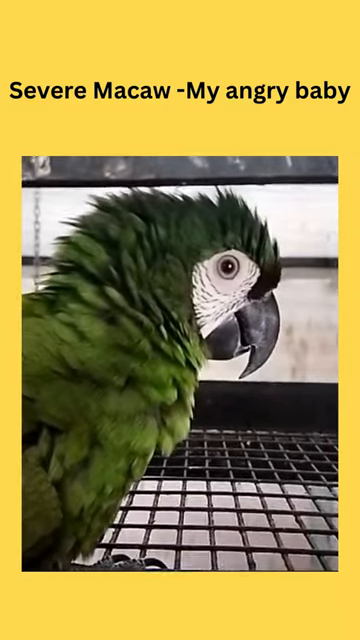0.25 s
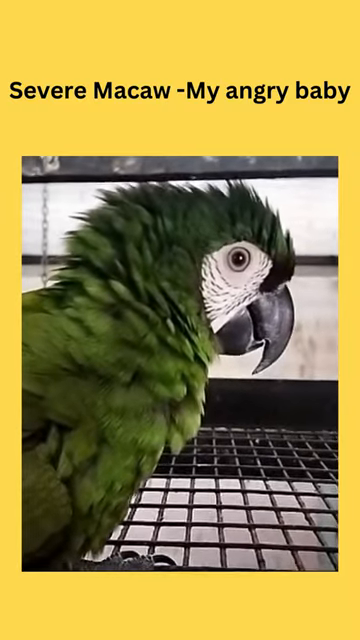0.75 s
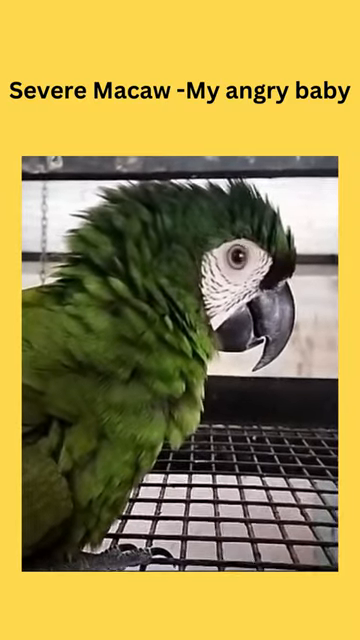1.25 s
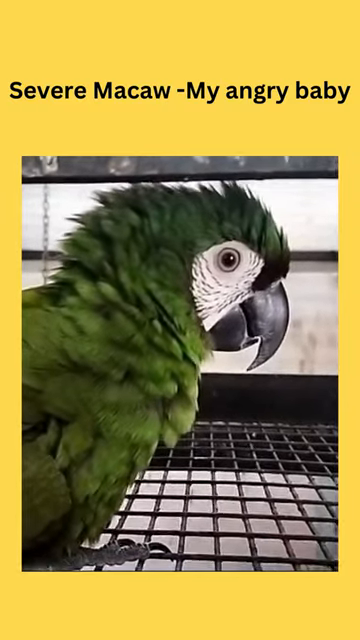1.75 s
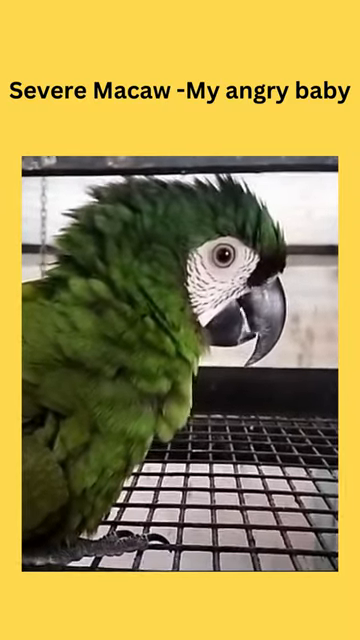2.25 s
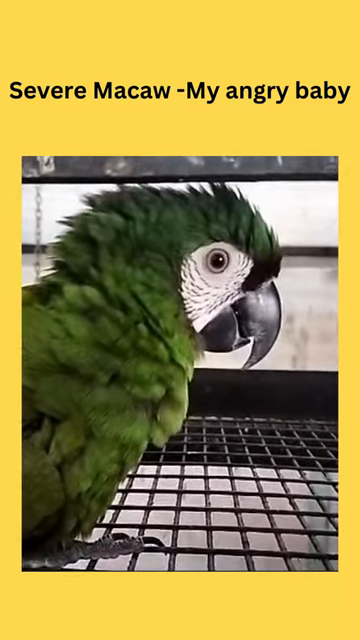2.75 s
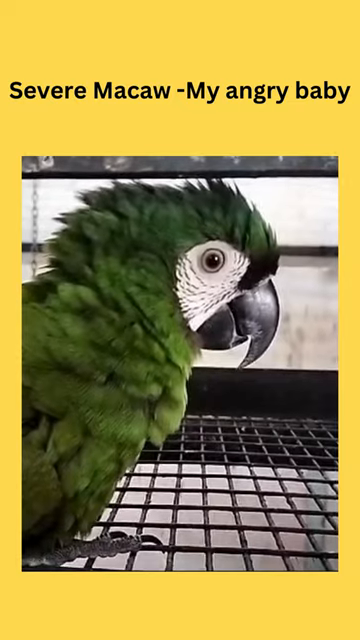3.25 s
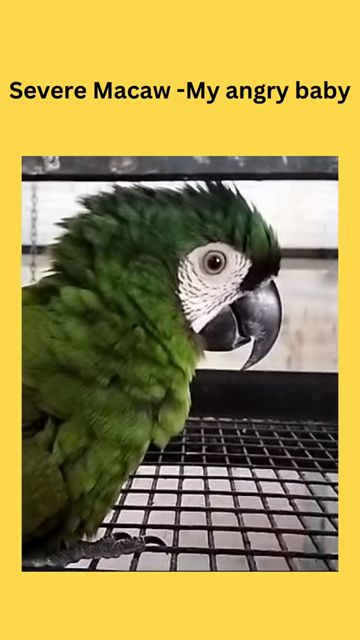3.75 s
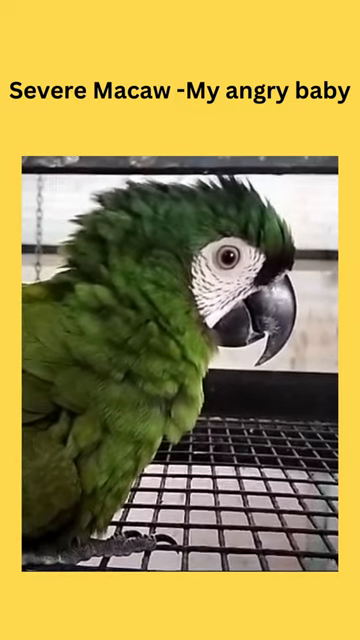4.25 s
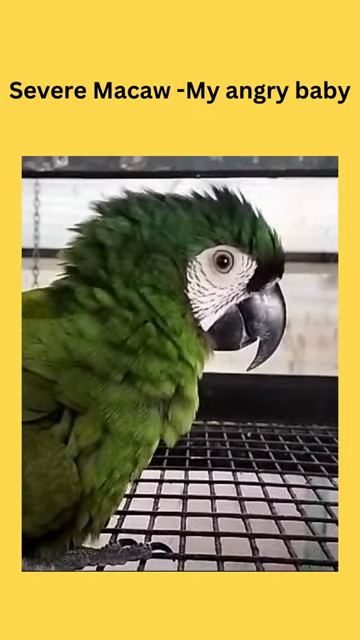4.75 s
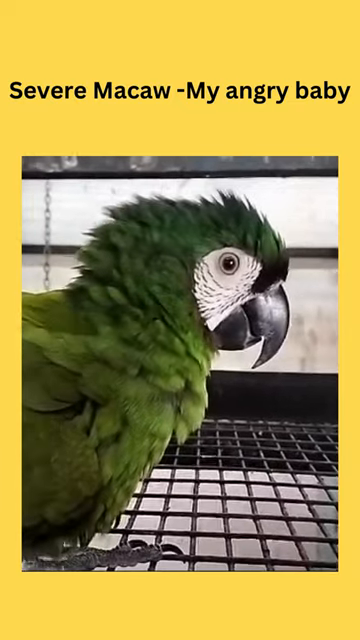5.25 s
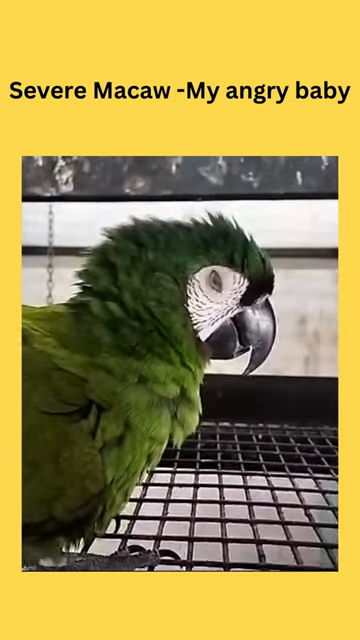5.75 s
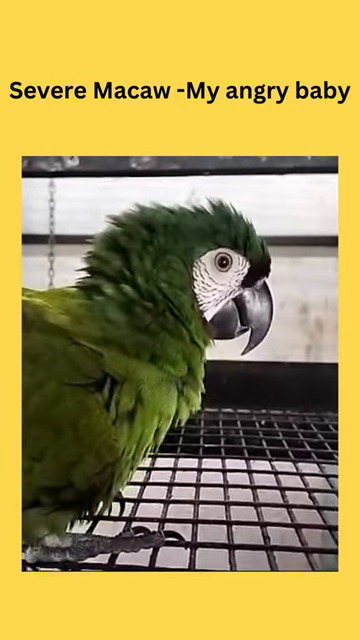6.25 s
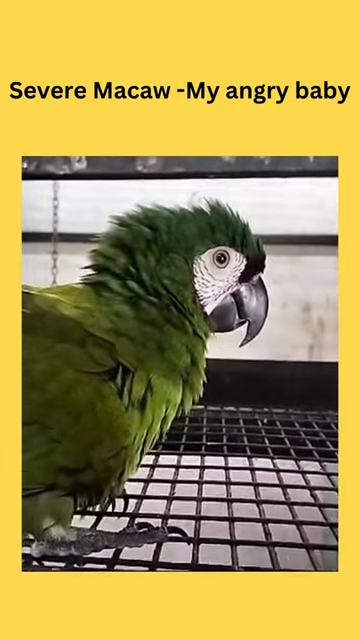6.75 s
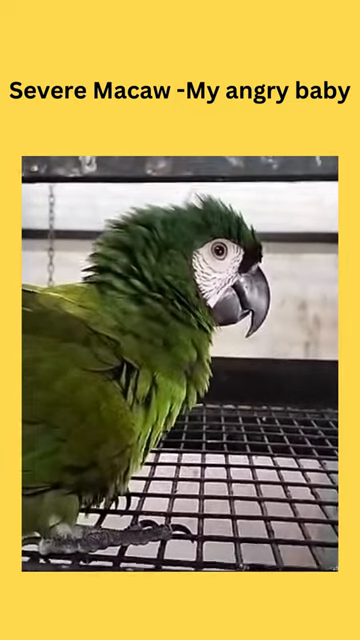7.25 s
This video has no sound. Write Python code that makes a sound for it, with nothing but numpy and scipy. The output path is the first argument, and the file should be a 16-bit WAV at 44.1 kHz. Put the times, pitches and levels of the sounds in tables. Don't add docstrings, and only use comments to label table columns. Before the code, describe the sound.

Raspy, piercing parrot screams in irregular bursts, a clicking beak rattle and two close gruff squawks, above steady humming fan rumble indoors.

```python
import sys
import numpy as np
from scipy import signal
from scipy.fft import rfft, irfft, next_fast_len
from scipy.io import wavfile
from scipy.ndimage import uniform_filter1d, map_coordinates

SR = 44100
rng = np.random.default_rng(int(sys.argv[2]) if len(sys.argv) > 2 else 0)


def wav_out(sig):
    wavfile.write(sys.argv[1], SR, np.round(np.clip(np.atleast_2d(sig).T, -1, 1) * 32767).astype(np.int16))


def level_to_linear(level):
    exponent = np.asarray(level, float) / 20
    return 10 ** exponent


N = 331632
T = np.arange(N) / SR


def unit(x):
    return x / np.sqrt(np.mean(x ** 2) + 1e-20)


def along(points, hz):
    f, v = np.transpose(points)
    return np.interp(np.log(hz + 1), np.log(f + 1), v)


def curves(rows):
    s, *cols = np.transpose(rows)
    return [np.interp(T, s, c) for c in cols]


def wobble(rate):
    return map_coordinates(rng.standard_normal(int(N * rate / SR) + 4), [T * rate])


def filtered(x, response):
    m = next_fast_len(N + SR // 2)
    return irfft(rfft(x, m) * response(np.fft.rfftfreq(m, 1 / SR)), m)[..., :N]


def coloured(x, spectrum):
    return unit(filtered(x, lambda hz: level_to_linear(along(spectrum, hz))))


def gate(rows, edge=0.00807):
    start, end = rows[0][0], rows[-1][0]
    return np.interp(T, [start - edge, start, end, end + edge], [0, 1, 1, 0])


def calls(rows, onset, swell_db, fall, under_db, tail):
    start, peak, db, *cols = (c[:, None] for c in np.transpose(rows))
    t = np.arange(0, N + 32, 32) / SR
    swell = -swell_db * np.clip((peak - t) / (peak - start), 0, 1)
    before = swell - onset * np.maximum(start - t, 0)
    late = np.maximum(t - peak, 0)
    after = np.maximum(-fall * late, -under_db - tail * late)
    power = level_to_linear(2 * (db + before + after)) + 1e-12
    share = power ** 2 / np.sum(power ** 2, axis=0)
    level_db = 10 * np.log10(power.sum(axis=0))
    out = [level_db] + [np.sum(share * c, axis=0) for c in [t - peak] + cols]
    return [np.interp(T, t, c) for c in out]


def syrinx(pitch_hz, jitter, rate, flutter_db):
    phase = 2 * np.pi * np.cumsum(pitch_hz * (1 + jitter * wobble(rate))) / SR
    return phase, unit(level_to_linear(flutter_db * wobble(rate=120)))


# t/s, depth level/dB, hold t/s
DUCKS = [(0.89, 9.5, 0.25), (1.296, 2, 0.34), (2.74, 3.5, 0.31), (4.449, 4.5, 0.39), (1.925, 13, 0.2),
         (2.155, 10, 0.25), (2.402, 7.5, 0.22), (3.351, 16.5, 0.066), (3.796, 4.5, 0.64),
         (4.852, 3.5, 0.17), (5.042, 17.5, 0.13), (5.403, 9.5, 0.51), (5.899, 22.5, 0.13), (6.381, 8, 0.27),
         (6.657, 15, .15), (6.873, 26.5, 0.094), (7.101, 17, .15), (7.302, 0, 0.34)]


def ducking():
    drop_db_per_s, recover_db_per_s = 603, 40.5
    dips = []
    for s, db, hold in DUCKS:
        going_down = drop_db_per_s * (T - s)
        coming_back = db - recover_db_per_s * (T - s - hold)
        dips.append(np.clip(np.minimum(going_down, coming_back), 0, db))
    return np.max(dips, axis=0)


# f/Hz, level/dB per Hz
RUMBLE = [(15, -49), (25, -22), (65, -6), (97, -7), (121, -6), (135, 1), (178, -0.5), (210, -7.5),
          (281, -4.5), (330, -14), (430, -19), (730, -120)]
# f/Hz, level/dB per Hz
WASH = [(200, -50), (320, 3), (900, 0.5), (1600, -3.5), (3000, 0.5), (8000, -26.5)]
# f/Hz, likeness [0 to 1]
ALIKE = [(25, 0.77), (80, 0.88), (130, 0.96), (300, 0.93)]


def fan():
    fan_db, hum_hz, hum_drift, hum_db = -39.5, 136, 0.062, -5
    wash_ducks = 0.87
    duck_db = ducking()

    def spread(hz):
        turn = np.arccos(np.clip(along(ALIKE, hz), 0, 1)) / 2
        return np.array([np.cos(turn), np.sin(turn)])

    mid, side = filtered(rng.standard_normal((2, N)), spread)
    rumble = coloured(np.array([mid + side, mid - side]), RUMBLE)
    rumble = unit(rumble * level_to_linear(0.64 * wobble(8.5)))
    hum_phase = 2 * np.pi * np.cumsum(hum_hz * (1 + hum_drift * wobble(3.1))) / SR
    rumble = rumble + level_to_linear(hum_db + 1.1 * wobble(3.04)) * np.sin(hum_phase)
    mid, side = rng.standard_normal((2, N)) * [[1], [.55]]
    wash = coloured(np.array([mid + side, mid - side]), WASH)
    return level_to_linear(fan_db - duck_db) * rumble + level_to_linear(fan_db - wash_ducks * duck_db) * wash


# start t/s, peak t/s, octave level/dB, octave f/Hz, fundamental level/dB
SCREAMS = [(.61, 0.708, -21.5, 4627, -1.5), (0.845, 0.907, -17, 4612, -8), (0.912, 0.945, -14, 4280, -7.5),
           (1.731, 1.82, -24, 4073, -3), (1.86, 1.949, -14, 4283, -3), (2.357, 2.396, -20, 4255, -7),
           (3.262, 3.309, -13, 4552, -6), (3.836, 3.949, -22, 3998, -3), (5.034, 5.171, -23.5, 4530, 0),
           (5.8, 5.9, -14.5, 4004, -9.5), (6.24, 6.356, -23, 4123, -5), (6.545, 6.61, -19, 4490, 1.5),
           (6.631, 6.705, -16, 4357, -5.5), (6.75, 6.816, -12.5, 4307, -5.5), (6.88, 7.019, -21, 4214, -1),
           (7.37, 7.451, -23.5, 4620, -0.5)]
SCREAM_ROUGH = [.038, .022, .02, .03, .027, .03, .02, .027, .03, .036, .034, .045, .036, .034, .028]
# start t/s, peak t/s, octave level/dB, octave f/Hz, fundamental level/dB
CHATTER = [(-.05, 0.012, -37, 3980, 8), (.31, 0.472, -28, 4180, -20), (1.229, 1.261, -30, 4405, -4),
           (1.42, 1.46, -32, 3970, 4.5), (2.078, 2.306, -33.5, 4266, -4), (2.481, 2.582, -28.5, 4397, -2),
           (2.68, 2.8, -34.5, 4320, -21), (3.09, 3.188, -24.5, 4010, 0), (3.421, 3.56, -31, 4064, -7.5),
           (3.981, 4.312, -24, 4050, -3.5), (4.302, 4.457, -25, 4583, 0), (4.747, 4.887, -29, 4176, -14.5),
           (5.42, 5.562, -28, 4730, -5), (5.64, 5.723, -32.5, 4100, 0)]


def high_screech():
    chatter_rough, calm_db = .036, -27
    sag_hz_per_s_db = 115
    linger_db_per_s = 7
    rows = np.array(SCREAMS + CHATTER)
    spare = len(SCREAMS) - len(SCREAM_ROUGH)
    scatter = SCREAM_ROUGH + [SCREAM_ROUGH[-1]] * spare + [chatter_rough] * len(CHATTER)
    rows = np.column_stack([rows, rows[:, 2], scatter])
    db, late, octave_hz, base_db, effort_db, rough = calls(
        rows, onset=400, swell_db=5, fall=150, under_db=9, tail=62)
    effort = np.maximum(effort_db - calm_db, 0)
    octave_hz = octave_hz - sag_hz_per_s_db * effort * np.clip(late, -.15, .1)
    base_db = base_db + linger_db_per_s * np.clip(late, 0, .3)
    phase, swing = syrinx(octave_hz / 2, jitter=rough, rate=280, flutter_db=3.5)
    upper = np.sin(2 * phase)
    for k, g in enumerate([-7, -19, -22], 3):
        upper = upper + level_to_linear(g) * np.sin(k * phase)
    hush_db = -9 * sum(map(gate, NEAR + YELPS[:1]))
    return level_to_linear(db + hush_db - 1.83) * swing * (upper + level_to_linear(base_db) * np.sin(phase))


def patchy(x, depth_db):
    z = signal.stft(x, nperseg=512)[2]
    field = uniform_filter1d(rng.standard_normal(z.shape), size=7, axis=0)
    field = uniform_filter1d(field, size=14, axis=1)
    return unit(signal.istft(z * level_to_linear(depth_db * unit(field)), nperseg=512)[1][:N])


# start t/s, peak t/s, level/dB, beak-open
# brightness level/dB
RASPS = [(-.05, .01, -37.5, -0.5), (.31, .49, -27, -3.5), (.58, .68, -29.5, -3.5), (.85, .96, -24.5, -1.5),
         (1.3, 1.45, -34, -9), (1.535, 1.555, -29, -5), (1.8, 1.88, -23, -6.5), (1.9, 1.97, -27.5, 9),
         (2.06, 2.26, -35.5, -18), (2.3, 2.38, -27.5, -7.5), (2.5, 2.58, -33.5, -8),
         (2.66, 2.85, -38, -3.5), (3.06, 3.2, -32, -3), (3.22, 3.255, -21.5, 0), (3.27, 3.34, -33.5, 23),
         (3.45, 3.6, -42, -12), (3.83, 4.1, -35, -3), (4.15, 4.45, -33, -2.5), (4.74, 4.86, -39, -0.5),
         (5.042, 5.06, -34.5, -8), (5.14, 5.19, -31, -9), (5.41, 5.55, -24, -12), (5.63, 5.72, -30.5, -9),
         (5.76, 5.8, -19, -9.5), (5.82, 5.9, -25.5, 3), (6.22, 6.4, -37.5, -5), (6.565, 6.61, -20.5, -3.5),
         (6.62, 6.78, -28, -2), (6.9, 7.03, -30.5, 0), (7.37, 7.5, -33, -5.5),
         (2.872, 2.985, -43, 3),
    (4.5, 4.583, -41, -5),
    (4.899, 4.967, -46.5, 1.5),
    (5.253, 5.318, -37, -7),
    (5.979, 6.082, -39, -10.5),
    (7.078, 7.259, -38, -7),
]
# f/Hz, level/dB per Hz
HARSH = [(530, -95), (900, -26), (1350, -7.5), (1640, -9.5), (2100, 3), (2620, -3.5), (3080, -4.5),
         (3290, 1.5), (4050, 4), (8500, -19.5), (11000, -62), (18700, -120)]
# f/Hz, level/dB per Hz
SHEEN = [(4410, -28), (7500, -0.5), (8710, -9), (9870, -11), (11500, -8.5), (13700, -18.5), (14250, -12),
         (14480, -39)]


def rasp():
    db, _, bright_db = calls(RASPS, onset=386, swell_db=3.4, fall=176, under_db=5.7, tail=70.5)
    struck = rng.random(N) < .3
    snaps = struck * rng.standard_normal(N) * level_to_linear(1.46 * wobble(90))
    body = patchy(coloured(snaps, HARSH), depth_db=3.5)
    sheen = patchy(coloured(snaps, SHEEN), depth_db=3.5)
    return level_to_linear(db) * body + level_to_linear(db + bright_db - 5.5) * sheen


# start t/s, peak t/s, octave level/dB, octave f/Hz, fundamental level/dB
LOW = [(.4, .47, -21.5, 2995, -8), (.61, .77, -42, 3105, 9.5), (.838, .853, -15.5, 3015, -10),
       (.875, .895, -19, 3200, -29), (1.15, 1.22, -40, 3109, -26), (1.56, 1.592, -22, 3084, -6.5),
       (1.83, 1.85, -19.5, 2773, -12), (2.765, 2.8, -33, 3307, -25), (2.86, 2.96, -36.5, 2721, -17.5),
       (3.91, 4.16, -31, 3377, -14), (4.2, 4.5, -35, 3026, -31), (4.735, 4.79, -32, 3162, -34),
       (4.82, 4.93, -34, 2775, -30), (5.45, 5.56, -20.5, 3231, -17), (5.745, 5.815, -16, 3020, -21),
       (6.28, 6.36, -36, 3114, -29), (6.54, 6.6, -24, 3263, -7), (6.66, 6.77, -25.5, 3193, -27),
       (7.05, 7.1, -29, 3053, -4), (7.14, 7.22, -36, 3080, -8), (7.39, 7.5, -32.5, 2889, -6)]
LOW_ROUGH = [.06, .05, .022, .06, .035, .03, .05, .035, .07, .07, .07, .035, .075, .07, .026, .04, .045,
             .05, .018, .022, .05]
# t/s, octave level/dB, octave f/Hz, fundamental level/dB
YELPS = [
    [(2.362, -35, 2758, 2), (2.378, -20.5, 3150, -5.5), (2.393, -22.5, 2660, -8), (2.42, -21, 2397, -12),
     (2.437, -29, 2150, -8)],
    [(3.2, -34, 2578, -19), (3.212, -19, 2650, -18), (3.226, -12, 3010, -16), (3.24, -14, 3200, -17),
     (3.262, -20, 3150, -19), (3.283, -37, 2900, -25), (3.3, -41, 3000, -16), (3.4, -50, 3210, -20)],
]
YELP_ROUGH = [.045, .028]


def low_screech():
    sag_hz_per_s = -300
    undertone_db = -22.5
    rows = np.column_stack([LOW, LOW_ROUGH])
    db, late, octave_hz, base_db, rough = calls(
        rows, onset=600, swell_db=6, fall=140, under_db=22, tail=110)
    octave_hz = octave_hz - sag_hz_per_s * np.clip(late, -.3, .3)
    on = sum(map(gate, YELPS))
    yelp_rough = sum(r * gate(y) for r, y in zip(YELP_ROUGH, YELPS))
    yelp = curves(YELPS[0] + YELPS[1]) + [yelp_rough]
    screech = (db, octave_hz, base_db, rough)
    db, octave_hz, base_db, rough = (a + on * (b - a) for a, b in zip(screech, yelp))
    phase, swing = syrinx(octave_hz / 2, jitter=rough, rate=280, flutter_db=3.5)
    open_db = 8.5 * gate([(1.7,), (1.7,)])
    upper = np.sin(2 * phase)
    for k, g in enumerate([-8, -12, -19], 3):
        upper = upper + level_to_linear(g + open_db) * np.sin(k * phase)
    base = level_to_linear(base_db + 2.0) * np.sin(phase)
    undertone = level_to_linear(undertone_db) * gate(YELPS[0]) * np.sin(2 * phase / 3)
    return level_to_linear(db + 2.0) * swing * (upper + base + undertone)


# f/Hz, delay t/s, level/dB
BEAK = [(1200, .001, -21), (3950, .0035, -3), (6630, .004, -20)]


def puffs(rows):
    rise_s, scatter = .0018, .06
    out, t = np.zeros(N), np.arange(1024) / SR
    for s, db, beak_hz in rows:
        puff = 0
        for hz, delay, g in BEAK + [(beak_hz, 0, 0)]:
            u = np.maximum(t - delay, 0) / rise_s
            swell = (u * np.exp(1 - u)) ** 2
            drift = 1 + scatter * map_coordinates(rng.standard_normal(16), [t * 400])
            cycles = np.cumsum(hz * drift) / SR + rng.random()
            puff = puff + level_to_linear(g + rng.normal(0, 1.5)) * swell * np.sin(2 * np.pi * cycles)
        out[round(s * SR):][:len(t)] += level_to_linear(db + 1.0) * puff
    return out


# t/s, peak level/dB, beak
# resonance f/Hz
RATTLE = [(1.3556, -19, 2430), (1.3702, -14, 2670), (1.386, -14, 2576), (1.4032, -16, 2400),
          (1.4228, -15.5, 2320), (1.4414, -18, 2240), (1.459, -21, 2180), (1.477, -24, 2025),
          (1.496, -21, 2012), (1.524, -19, 2200), (1.532, -20, 2320), (1.544, -16, 2600),
          (2.064, -22, 2040), (2.077, -16, 2120), (2.24, -16, 2090), (2.254, -17.5, 2490),
          (2.339, -23, 2520), (2.357, -18.5, 2600), (2.373, -12, 2840), (2.381, -24, 3180),
          (2.39, -14, 2670), (2.398, -18, 2570), (2.411, -11, 2450), (2.421, -20, 2240)]


def rattle():
    return level_to_linear(-2.0) * puffs(RATTLE)


# t/s, level/dB, pitch f/Hz
NEAR = [
    [(2.025, -47, 644.4), (2.05, -41.5, 863), (2.08, -35.5, 1016), (2.1, -34.5, 946), (2.108, -36, 736.4),
     (2.17, -38, 691), (2.232, -36.5, 804), (2.245, -39.5, 959), (2.27, -39, 993)],
    [(5.015, -47, 591), (5.036, -35.5, 619.3), (5.041, -30.5, 780), (5.065, -30, 697.6), (5.13, -36.5, 709),
     (5.142, -39.5, 571.4), (5.18, -34.5, 631), (5.214, -31.5, 819), (5.228, -49.5, 790)],
]
NEAR_ROUGH = [
    [.05, .09, .1, .1, .035, .035, .04, .14, .14],
    [.08, .1, .06, .045, .045, .03, .035, .04, .06],
]
# air level/dB, level/dB of the lines halfway between overtones
NEAR_MIX = [(5, -10.5), (10, -4)]
# f/Hz, level/dB
THROATS = [
    [(500, -11), (750, 2.5), (1000, 3), (1450, 15.5), (2100, 20), (2450, 5), (2900, 16), (3300, 14),
     (3700, 10), (4700, 9), (6000, 6), (7600, -13)],
    [(500, 2), (750, 1), (1150, 3), (1550, 18), (2100, 15), (2700, 5), (3200, 15.5), (3650, -33),
     (4100, -1), (4600, 15), (6000, 4), (7600, -2)],
]
# f/Hz, level/dB
NASAL = [(8800, 2), (10200, -22), (11300, 3.5), (13000, 3), (14300, -14)]
# t/s, peak level/dB, beak resonance f/Hz
GROWL = [(5.0395, -17, 2120), (5.066, -10, 2016), (5.072, -10, 2010), (5.081, -14, 2090),
         (5.092, -11, 2050), (5.108, -13, 2077), (5.116, -13, 2090), (5.17, -13.5, 2050),
         (5.184, -15, 1970), (5.193, -11, 2100), (5.207, -14.5, 2150)]


def squawks():
    break_db = 3.5
    out, breath = np.zeros(N), rng.standard_normal(N)
    for rows, throat, rough, (air_db, half_db) in zip(NEAR, THROATS, NEAR_ROUGH, NEAR_MIX):
        db, pitch_hz, rough = curves(np.column_stack([rows, rough]))
        phase, swing = syrinx(pitch_hz, jitter=rough, rate=230, flutter_db=1.6)
        tone = 0
        for k in range(2, 24):
            line_db = along(throat, k * pitch_hz / 2) + half_db * (k % 2)
            line_db = line_db + break_db * wobble(rate=70) - 1.5
            tone = tone + level_to_linear(line_db) * np.sin(k * phase / 2 + k * k)
        air = coloured(breath * (1 + np.cos(phase)), [(380, -50)] + throat + NASAL)
        out += gate(rows) * level_to_linear(db) * swing * (tone + level_to_linear(air_db) * air)
    return out + puffs(GROWL)


# f/Hz, t60 t/s
ROOM = [(500, 0.91), (2500, 0.19), (6000, 0.19), (12000, 0.071)]
# f/Hz, level/dB
WET = [(1000, 1.5), (3000, 12.5), (5000, 9), (6000, 12), (8000, -17), (9000, 11.5), (13000, -0.5)]


def room(x):
    out, perches, perch_s = 0, 4, .35
    for k in range(perches):
        hz, t, z = signal.stft(rng.standard_normal((2, SR // 2)), SR, nperseg=256)
        decay_db = along(WET, hz)[:, None] - 60 * t / along(ROOM, hz)[:, None]
        tail = signal.istft(z * level_to_linear(decay_db), SR, nperseg=256)[1]
        away = np.abs((T / perch_s - k) % perches - perches / 2)
        turn = np.cos(np.pi / 2 * np.minimum(away, 1))
        sent = np.pad(x * turn, (300, 0))[None]
        out = out + signal.fftconvolve(sent, tail * 0.022, axes=1)[:, :N]
    return out


# f/Hz, lead [rad]
LEAD = [(690, -.2), (950, 0), (1380, -2.7), (3190, -2.8), (3960, -4.5), (5000, -6.6), (5770, -6.28)]
# f/Hz, level/dB
SPREAD = [(1000, 5), (5000, -14), (6200, -26), (8000, -37), (9000, -21), (13000, -21)]
# f/Hz, level/dB
TILT = [(60, 1), (110, -6), (200, 4), (370, 10), (680, -1.5), (1240, -1), (2270, -10.5), (4150, -3.5),
        (7600, 2.5), (13900, 6.5)]


def scene():
    near_pan_db, low_pan_db = 1.5, -1
    high, harsh, low = high_screech(), rasp(), low_screech()
    clatter, near = rattle(), squawks()
    side = np.array([[.5], [-.5]])

    def at_ports(x, way):
        return filtered(x, lambda hz: np.exp(way * 1j * side * along(LEAD, hz)))

    direct = at_ports(high + harsh, 0.96)
    direct = direct + at_ports(near * level_to_linear(side * near_pan_db), 0.84)
    direct = direct + at_ports(clatter, 0.15)
    direct = direct + at_ports(low * level_to_linear(side * low_pan_db), 0.73)
    direct = direct + 2 * side * filtered(rasp(), lambda hz: level_to_linear(along(SPREAD, hz)))
    send = level_to_linear(-8) * low + level_to_linear(-4) * high + harsh + level_to_linear(-13) * (near + 2 * clatter)
    heard = filtered(direct + room(send), lambda hz: level_to_linear(side * along(TILT, hz)))
    return heard + fan()


# f/Hz, level/dB
MASK = [(1500, -26), (2600, -17), (5000, -11.5), (7000, -3.5), (10000, -2.5), (12500, -1.5), (14000, .5)]


def masked(x):
    hz, _, z = signal.stft(x, SR, nperseg=2048)
    power = uniform_filter1d(np.mean(np.abs(z) ** 2, axis=0), size=2, axis=1)
    band = uniform_filter1d(power, size=5, axis=0)
    around = uniform_filter1d(power, size=60, axis=0)
    keep = band > around * level_to_linear(2 * along(MASK, hz))[:, None]
    return signal.istft(z * keep, SR, nperseg=2048)[1][:, :N]


def roll_off(x):
    return signal.sosfilt(signal.butter(12, 14530, fs=SR, output="sos"), x)


def record(dry):
    ceiling = .8
    soft = dry / (1 + np.abs(dry / ceiling) ** 4) ** (1 / 4)
    mix = masked(soft)
    return roll_off(mix)


dry = scene()
out = record(dry)
wav_out(out)
```